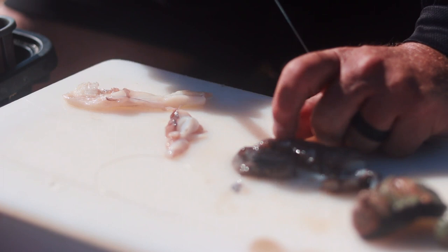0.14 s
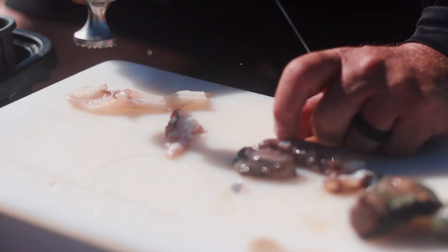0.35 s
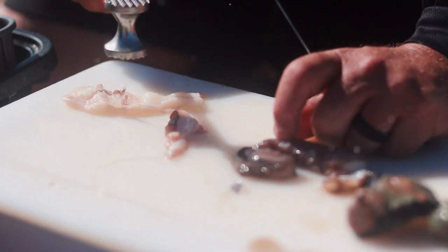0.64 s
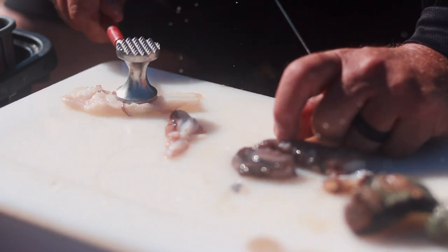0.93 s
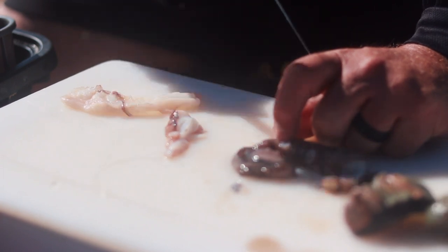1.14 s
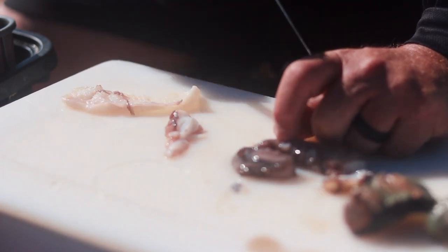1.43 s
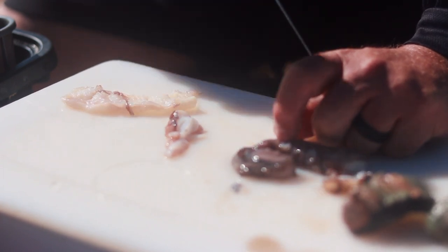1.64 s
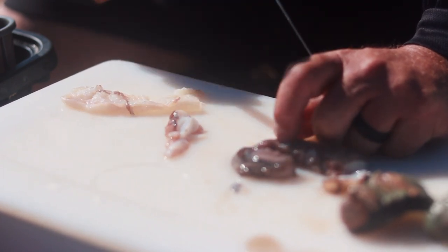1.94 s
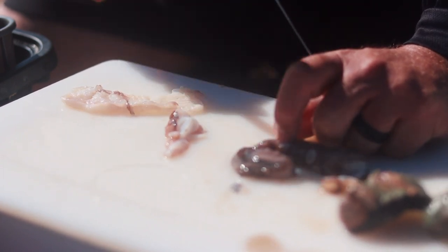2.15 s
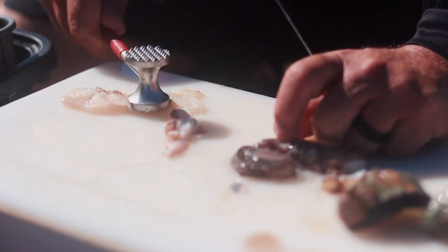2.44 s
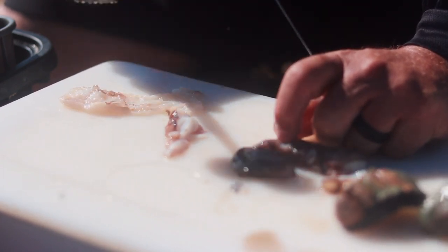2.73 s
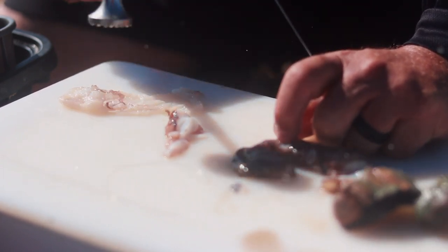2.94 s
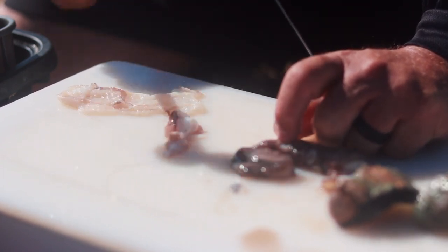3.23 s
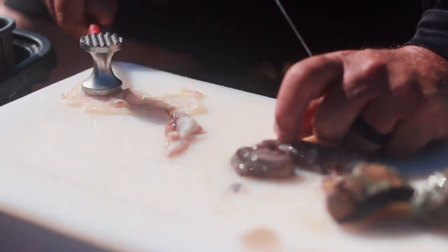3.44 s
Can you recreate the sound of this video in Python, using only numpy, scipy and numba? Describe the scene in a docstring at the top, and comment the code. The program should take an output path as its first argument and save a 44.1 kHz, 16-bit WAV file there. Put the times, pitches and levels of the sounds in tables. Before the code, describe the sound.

A small metal mallet pounds wet bait on a plastic cutting board, close up, fourteen times from 0.2 to 3.5 seconds. Each blow is a short thud and squirt with a sharp crack, the loudest slightly distorted. They come a third of a second apart at first, then quicken and soften somewhat after about 2 seconds. Quieter water slaps and a breezy hiss continue behind, fading near the end.

```python
"""Fourteen quick thudding, cracking blows: a small metal mallet pounds bait on a plastic board outdoors.
Each impact lands on the wet flesh with a thud and a squirt, then bottoms out on the cutting board,
which cracks and rings briefly in its damped modes. Behind it, water seems to slap a hull under a
breezy hiss. The blows overload the recorder, whose limiter ducks the whole scene after them."""
import sys
import numpy as np
from scipy import signal
from scipy.fft import rfft, irfft
from scipy.io import wavfile
from scipy.ndimage import uniform_filter1d, minimum_filter1d
from numba import njit

SR = 44100
rng = np.random.default_rng(int(sys.argv[2]) if len(sys.argv) > 2 else 0)


def transcribe(signal):
    """Save signal, clipped to [-1, 1], as a 16-bit WAV file at the path in sys.argv[1]."""
    frames = np.atleast_2d(signal).T
    limited = np.clip(frames, -1, 1)
    pcm = np.round(limited * 32767).astype(np.int16)
    wavfile.write(sys.argv[1], SR, pcm)


N = 158760

# Slow level contours of the background: time_s, wash_db, hiss_db
BACKGROUND_LEVELS = [(0, -29, -36), (.45, -29.5, -34), (.8, -29.5, -38.5), (1.1, -32, -37.5),
                     (1.4, -29, -36.5), (1.7, -28.5, -36.5), (2.0, -27.5, -40), (2.3, -30.5, -39),
                     (2.6, -31.5, -37), (2.8, -27, -40.5), (3.15, -35.5, -43.5), (3.6, -33, -46)]


def mallet():
    """Two-stage impact: soft flesh yields with a thud and a squirt, then the hard board stops the head."""
    # start_s, sink_ms (through the flesh), thud_db, squirt_db, knock_db, crack_db, pop_hz, pop_db
    blows = [(.2347, 1.5, 7, 12, 7, 8, 1370, 9.5), (0.5611, 2.04, 2, -10.5, 7.5, 8, 1222, 7.5),
             (0.8863, 1.93, 3, 1.5, 5, 7.5, 807, 0.5), (1.201, 2.95, 1, -24, 3, 1, 920, 6.5),
             (1.5029, 2.32, 9, -15.5, -7, -12.5, 723, -9), (1.7499, 1.78, 8.5, 6, -2, -5.5, 1330, -30),
             (1.9912, 3.21, 3.5, -3.5, 2.5, -5.5, 950, -2.5), (2.2068, 3.21, 3.5, 8, 3.5, -13, 2950, -1.5),
             (2.4258, 1.91, 1.5, -5.5, 2.5, 2.5, 2170, -1.5), (2.6323, 1.9, -3, 3, 4, 6.5, 1456, 2.5),
             (2.8402, 1.78, -3.5, -3, 0, 0.5, 846, 0.5), (3.0488, 1.96, -5.5, -7.5, -2, 2, 1270, -2),
             (3.2594, 1.5, -22, 5, -3.5, -5.5, 2750, 4), (3.4647, 1.75, -12, -3.5, -3, -0.5, 2010, 1.5)]
    # Spectrum of squirt and crack: frequency_hz, density_db
    contact_spectrum = [(40, -30), (500, -2), (1200, 6), (2700, -0.5), (3600, -0.5), (5200, -9.5),
                        (6400, -6.5), (7600, 5.5), (8800, -4), (10500, -0.5), (13000, -14.5), (16000, -27)]
    # Spectrum of the reflections from things nearby: frequency_hz, density_db
    reflection_spectrum = [(60, 6), (200, 17), (450, -20.5), (1400, 14.5), (2800, -25), (4800, -39),
                           (8000, -34), (16000, -53)]
    thud_hz, side_db, size = 361, -3.5, 8192
    t = np.arange(size) / SR
    out = np.zeros((2, N))
    for start_s, sink_ms, thud_db, squirt_db, knock_db, crack_db, pop_hz, pop_db in blows:
        soft_onset = 1 - .6 * decay(t, t60_s=.0041)
        thud = undb(thud_db - 1.5) * damped_sine(t, thud_hz, t60_s=.036) * soft_onset
        squirt = undb(squirt_db) * noise(contact_spectrum, side_db, size) * decay(t, t60_s=.0064)
        contact_age = t - sink_ms / 1000  # zero as the head meets the board
        reflections = noise(reflection_spectrum, side_db, size) * decay(contact_age, t60_s=.077)
        knock = undb(knock_db) * (undb(-4.5) * board(contact_age) + undb(-26) * reflections)
        pop = undb(pop_db) * damped_sine(contact_age, pop_hz, t60_s=.02)
        snap = undb(9) * decay(contact_age, t60_s=.0051)
        head_ring = undb(-2) * decay(contact_age, t60_s=.017)
        crack = undb(crack_db) * (snap + head_ring) * noise(contact_spectrum, side_db, size)
        add(out, start_s, thud + squirt + knock + pop + crack)
    return out


def board(t):
    """Modal superposition: each blow and each microphone port weighs the damped modes differently."""
    # Modes of the plastic board: frequency_hz, level_db, t60_s
    modes = [(179, -29, .04), (438, -0.5, 0.069), (701, 1.5, 0.021), (926, -4, 0.045), (1042, -5.5, 0.027),
             (1205, -7, 0.035), (1392, 0.5, 0.031), (1497, -5, 0.044), (2040, -2.5, 0.022),
             (2267, -0.5, 0.023), (2465, -0.5, 0.017), (2720, 2, 0.012), (3002, 0.5, 0.017),
             (3424, 0, 0.017), (4080, -19, 0.018)]
    scatter_db, scatter_rad, detune = 2, .14, .028
    out = 0
    for hz, db, t60_s in modes:
        weight, tuning, lag, balance_db = rng.standard_normal(4)
        phase = 2 * np.pi * hz * (1 + detune * tuning) * t + scatter_rad * lag * np.array([[1], [-1]])
        gain = rng.choice([-1, 1]) * undb(db + scatter_db * weight)
        out = out + gain * pan(balance_db) * np.sin(phase) * decay(t, t60_s)
    return out


def at_ports(sound):
    """Microphone response: the bass of the blows is rolled off; each port has its own level and phase."""
    # Level difference between the microphone ports: frequency_hz, left_minus_right_db
    port_balance = [(100, 8), (400, 1), (1200, -3), (2400, -6.5), (4200, -5), (8000, -0.5), (15000, -1)]
    # Phase difference between them: frequency_hz, left_lead_rad
    port_phase = [(100, 0), (1900, -0.29), (3200, -0.64), (5000, 0.19), (8000, 1.2), (11000, 0.71),
                  (16000, 2.3)]
    left = undb(at_bins(port_balance, N) / 2) * np.exp(.5j * at_bins(port_phase, N))
    heard = irfft(rfft(sound) * np.array([left, 1 / left]), N)
    return butterworth(heard, "high", cutoff_hz=300)


def echo(sound):
    """Early reflection: a surface close by returns one delayed, dull copy."""
    out = np.zeros((2, N))
    add(out, start_s=.015, sound=undb(-28) * butterworth(sound, "low", cutoff_hz=2400))
    return out


def water_slaps():
    """Transient excitation: each slap is a noise burst that swells fast and dies slower, with plops."""
    # Slaps of the water: peak_s, length_s, level_db, tilt_db_per_octave
    slaps = [(0.072, 0.017, -35, -1.5), (0.19, 0.021, -28, -1), (0.485, 0.059, -23.5, -4),
             (0.526, 0.015, -18, -1), (0.542, 0.025, -15.5, -1.5), (.703, 0.022, -23, -1),
             (0.769, .02, -19.5, 1), (0.786, .05, -14, -.5), (0.838, 0.018, -16, .5),
             (0.879, 0.037, -20, -4), (1.018, 0.045, -23, -1), (1.178, 0.036, -22.5, -1),
             (1.465, 0.016, -23, -3), (1.55, 0.011, -19, 1), (1.628, 0.03, -25, 0.5),
             (1.713, 0.038, -17.5, -1.5), (1.738, 0.0099, -15.5, 1), (1.823, 0.017, -24, 2),
             (1.919, 0.022, -16.5, 2), (1.94, 0.037, -17.5, 1.5), (1.981, 0.032, -19, 3.5),
             (2.056, 0.031, -13.5, 0), (2.16, 0.029, -23, 2), (2.34, 0.021, -37.5, -5.5),
             (2.476, 0.0186, -16, -2.5), (2.585, 0.039, -28, -3), (2.727, 0.0205, -19.5, 0),
             (2.929, 0.014, -20, 2.5), (3.134, 0.013, -21, 2.5), (3.168, 0.019, -21, 0),
             (3.248, .012, -20, 2.5), (3.597, 0.017, -23, -2.5)]
    # Spectrum of a slap before its tilt: frequency_hz, density_db
    slap_spectrum = [(25, -28), (70, -36.5), (140, -7), (250, 0.5), (400, 1.5), (650, -5.5), (1300, -12.5),
                     (2200, -26), (4000, -43), (16000, -74)]
    rise_to_fall, size = .34, 16384
    t = (np.arange(size) - size / 2) / SR
    out = np.zeros((2, N))
    for peak_s, length_s, level_db, tilt in slaps:
        swell = np.exp(-2 * np.maximum(t, -t / rise_to_fall) / length_s)
        splash = swell * noise(slap_spectrum, side_db=-2, size=size, tilt=tilt)
        add(out, peak_s + t[0], undb(level_db) * (splash + plops(t, length_s, tilt)))
    return out


def plops(t, length_s, tilt):
    """Damped oscillation: six short, low tones about a slap's peak, higher when the slap is brighter."""
    base_hz, spread_octaves, ring_cycles = 505, .4, 7
    out = 0
    for when, pitch, strength, side in rng.standard_normal((6, 4)):
        age = t - .4 * length_s * when
        hz = np.clip(base_hz * 2 ** (spread_octaves * pitch + .2 * tilt), 150, 2200)
        gain = undb(2 + 1.5 * strength) * min(1, base_hz / hz)
        out = out + gain * pan(4 * side) * damped_sine(age, hz, t60_s=ring_cycles / hz)
    return out


def wash():
    """Amplitude modulation: the low noise of the water drifts in level and flickers quickly."""
    # Spectrum of the wash: frequency_hz, density_db
    wash_spectrum = [(25, -27), (60, -13), (130, -8.5), (250, 1), (390, -0.5), (600, -4.5), (1300, -11),
                     (2000, -22), (3500, -24), (6000, -47), (16000, -65)]
    level_db = contour(BACKGROUND_LEVELS, column=1) + 2.04 * flicker(rate_hz=84.2)
    return undb(level_db) * noise(wash_spectrum, side_db=-2)


def hollow_drone():
    """Narrow-band noise: a spectral peak near 395 Hz is heard as a hollow pitch that swells midway."""
    # Spectrum of the drone: frequency_hz, density_db
    drone_spectrum = [(30, -68), (300, -30), (370, -9), (395, 2.5), (425, -12), (520, -23), (3000, -69)]
    # Its level contour: time_s, level_db
    drone_levels = [(0, -44), (1.3, -48.5), (1.6, -31), (2.2, -34), (2.6, -34.5), (3.6, -43)]
    return undb(contour(drone_levels, column=1)) * noise(drone_spectrum, side_db=-2)


def hiss():
    """Broadband noise: a smooth, breezy hiss whose level drifts slowly."""
    # Spectrum of the hiss: frequency_hz, density_db
    hiss_spectrum = [(100, -6.5), (1000, 5), (1500, 12.5), (2500, 8.5), (3600, 2.5), (5000, -1.5),
                     (7000, -1.5), (10000, -3.5), (13000, -7), (16000, -21.5)]
    return undb(contour(BACKGROUND_LEVELS, column=2)) * noise(hiss_spectrum, side_db=1)


def undb(db):
    """Decibels to amplitude ratio."""
    return 10 ** (np.asarray(db) / 20)


def decay(t, t60_s):
    """Exponential decay from t = 0, falling 60 dB in t60_s."""
    return (t >= 0) * np.exp(-np.log(1000) * np.maximum(t, 0) / t60_s)


def damped_sine(t, hz, t60_s):
    """Impulse response of a damped oscillator."""
    return np.sin(2 * np.pi * hz * t) * decay(t, t60_s)


def pan(db):
    """Amplitude panning: two gains for a left-minus-right level difference."""
    return undb(np.array([[db], [-db]]) / 2)


def bin_octaves(size):
    """Logarithmic frequency: each Fourier bin in octaves above 1 Hz."""
    return np.log2(np.maximum(np.fft.rfftfreq(size, 1 / SR), 1))


def at_bins(curve, size):
    """Interpolation of a curve over logarithmic frequency, one value per Fourier bin."""
    hz, values = np.array(curve).T
    return np.interp(bin_octaves(size), np.log2(hz), values)


def contour(table, column):
    """Linear interpolation of a column over time, one value per sample."""
    columns = np.array(table).T
    return np.interp(np.arange(N) / SR, columns[0], columns[column])


def noise(spectrum, side_db, size=N, tilt=0):
    """Spectral shaping: mid-side stereo noise of rms 1, tilted in dB per octave up to 2 kHz."""
    shape_db = at_bins(spectrum, size) + tilt * np.minimum(bin_octaves(size), 11)
    mid, side = irfft(rfft(rng.standard_normal((2, size))) * undb(shape_db), size)
    out = mid + undb(side_db) * np.array([side, -side])
    return out / np.sqrt(np.mean(out ** 2))


def flicker(rate_hz):
    """Random modulation: smoothed steps with a standard deviation of 1."""
    step = int(SR / rate_hz)
    steps = rng.standard_normal(1024)[np.arange(N) // step % 1024]
    smooth = uniform_filter1d(steps, step)
    return smooth / smooth.std()


def butterworth(sound, kind, cutoff_hz):
    """Second-order filter: 12 dB per octave beyond the cutoff."""
    return signal.sosfilt(signal.butter(2, cutoff_hz, kind, fs=SR, output="sos"), sound)


def add(out, start_s, sound):
    """Superposition: mix a sound in from a start time."""
    i = int(round(start_s * SR))
    lo, hi = max(i, 0), min(i + sound.shape[1], N)
    out[:, lo:hi] += sound[:, lo - i:hi - i]


@njit
def limiter_cut_db(level_db):
    """Peak limiting: gain reduction with a quick attack, a short hold and a steady release."""
    limit_db, attack_s, hold_s, release_db_per_s = -2., .002, .051, 146.
    cut_db, wait = 9., 0.  # starts already ducked
    out = np.empty(len(level_db))
    for i in range(len(level_db)):
        over_db = level_db[i] - limit_db
        if over_db > cut_db:
            cut_db += (over_db - cut_db) / (attack_s * SR)
            wait = hold_s * SR
        elif wait > 0:
            wait -= 1
        else:
            cut_db = max(cut_db - release_db_per_s / SR, 0.)
        out[i] = cut_db
    return out


def scene():
    """Superposition: the mallet close by with its echo, water to the right and hiss behind."""
    blows = at_ports(mallet())
    water = water_slaps() + wash() + hollow_drone()
    return blows + echo(blows) + water * pan(-5) + hiss()


def record(dry):
    """Overload: the limiter ducks too slowly to keep the first peaks from clipping; band edges are cut."""
    ceiling, top_hz = .8, 15800
    peak = -minimum_filter1d(-np.abs(dry).max(axis=0), size=15)  # running maximum
    ducked = dry * undb(-limiter_cut_db(20 * np.log10(peak + 1e-9)))
    clipped = np.clip(butterworth(ducked, "high", cutoff_hz=102), -ceiling, ceiling)
    return signal.sosfilt(signal.ellip(10, .1, 70, top_hz, fs=SR, output="sos"), clipped)


dry = scene()
out = record(dry)
transcribe(out)
```